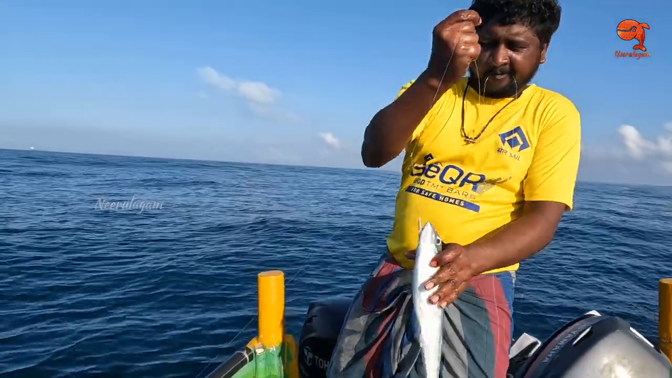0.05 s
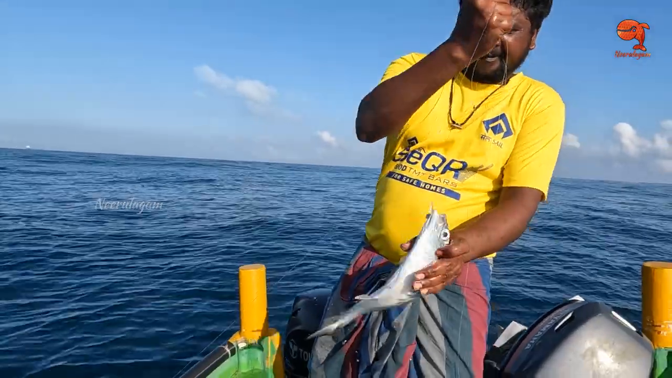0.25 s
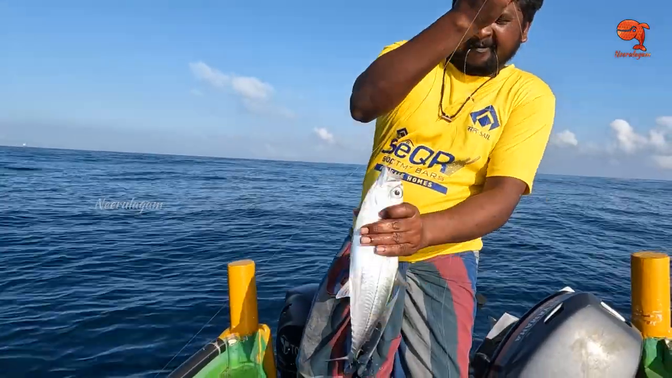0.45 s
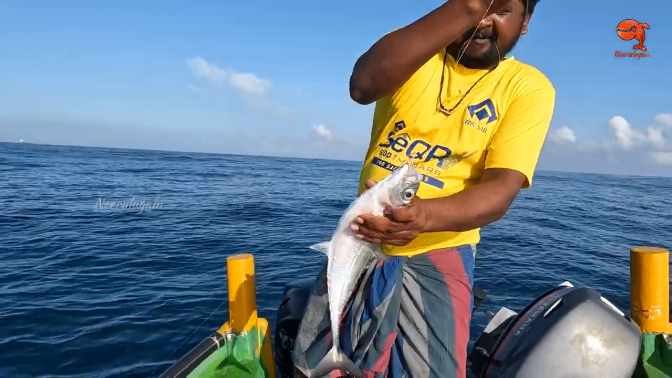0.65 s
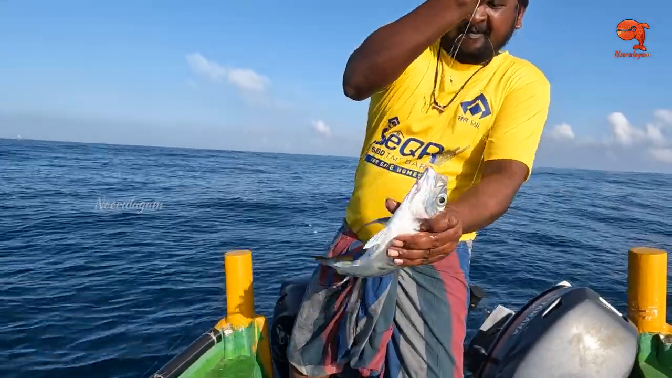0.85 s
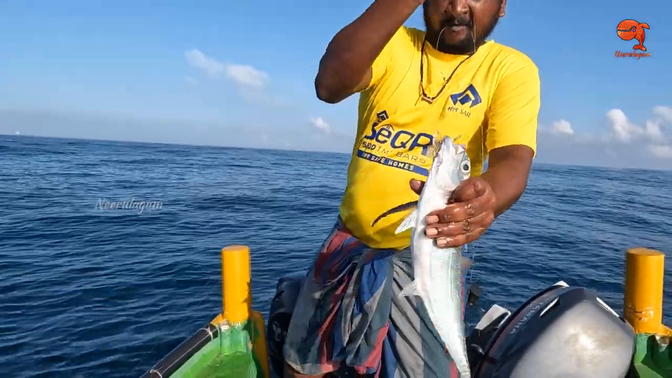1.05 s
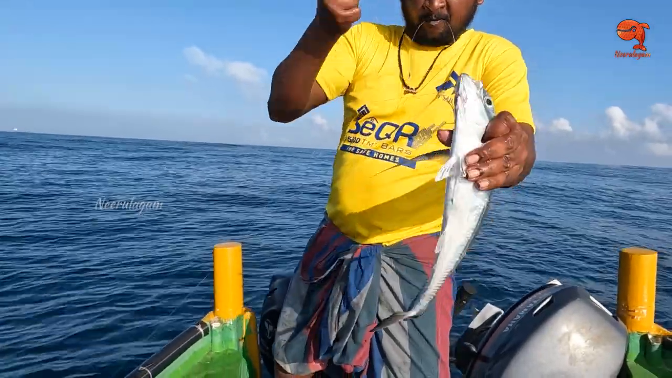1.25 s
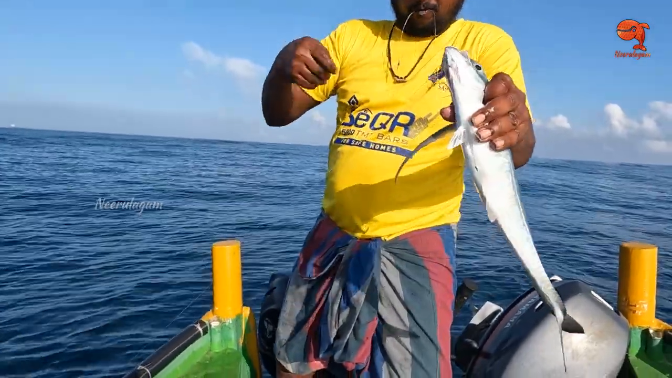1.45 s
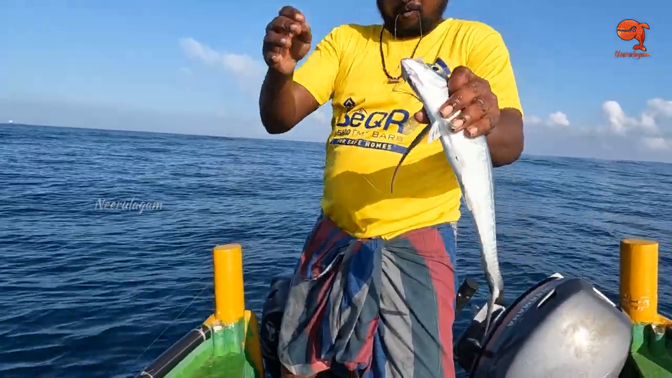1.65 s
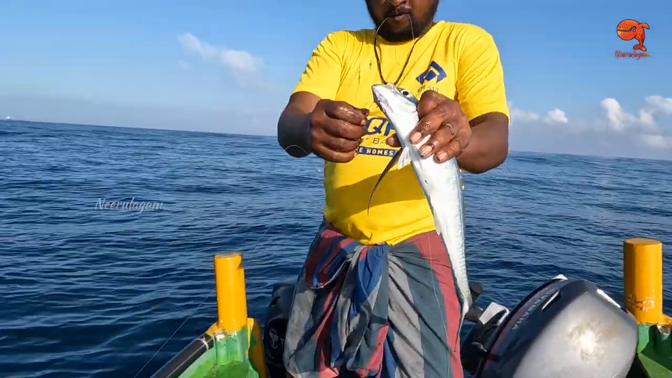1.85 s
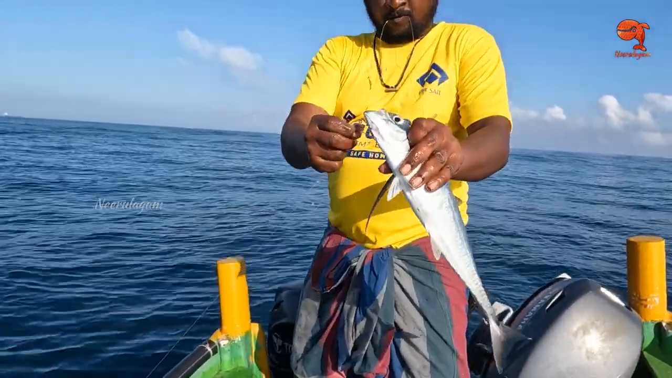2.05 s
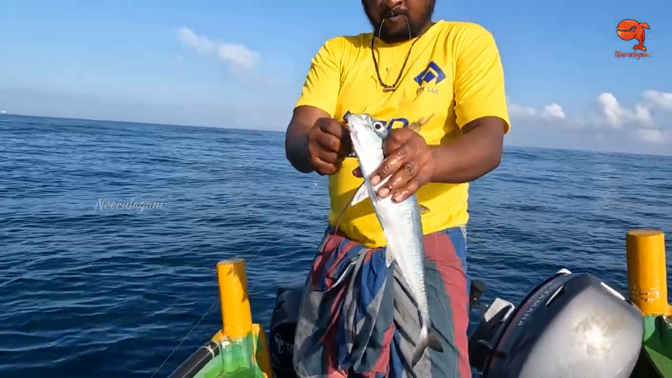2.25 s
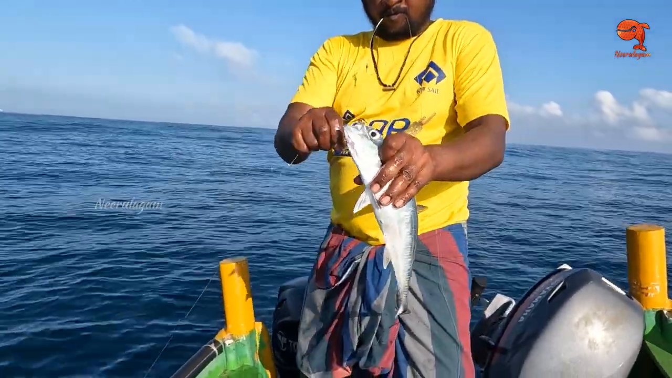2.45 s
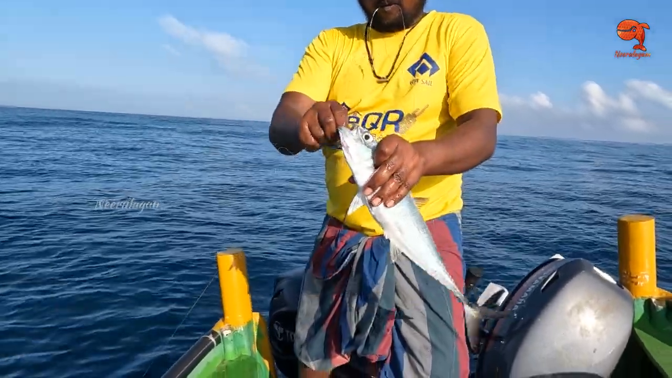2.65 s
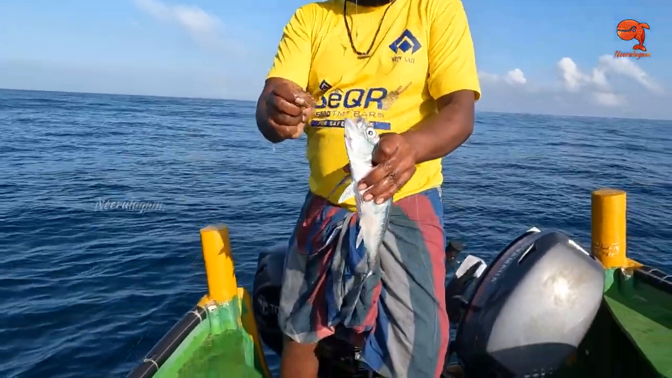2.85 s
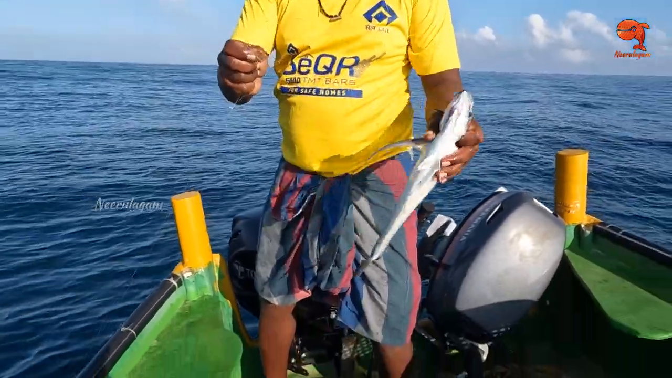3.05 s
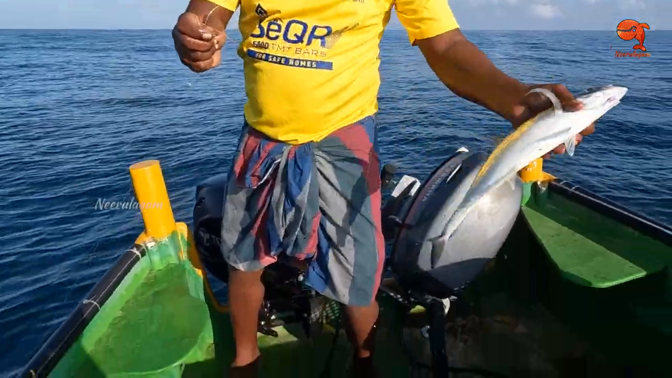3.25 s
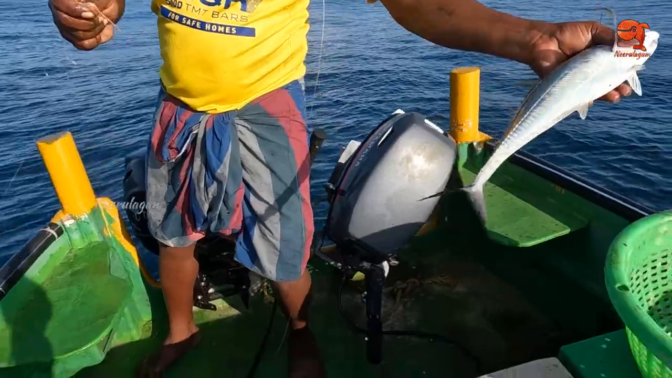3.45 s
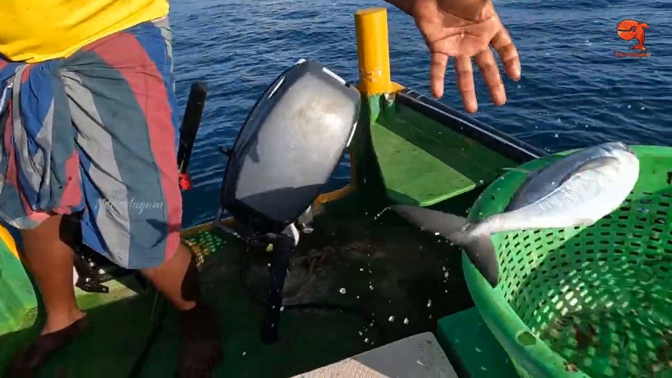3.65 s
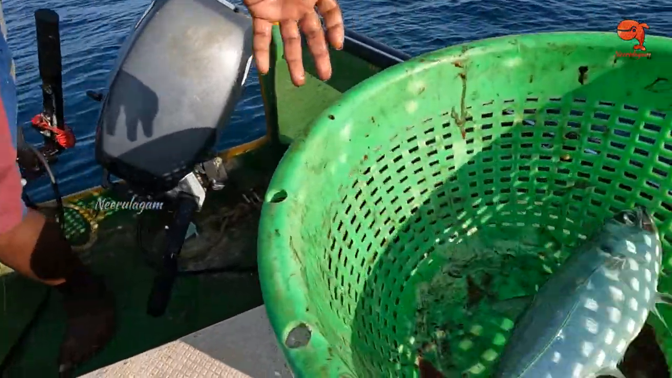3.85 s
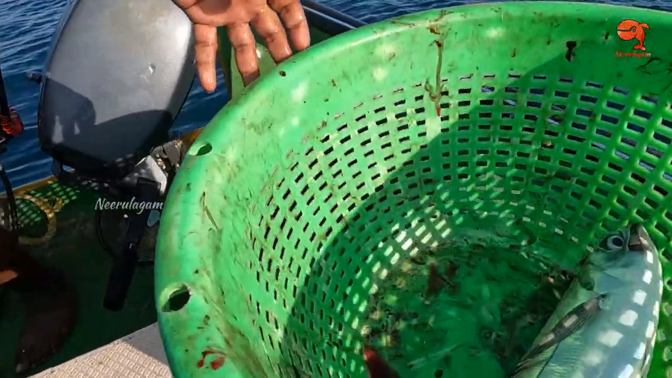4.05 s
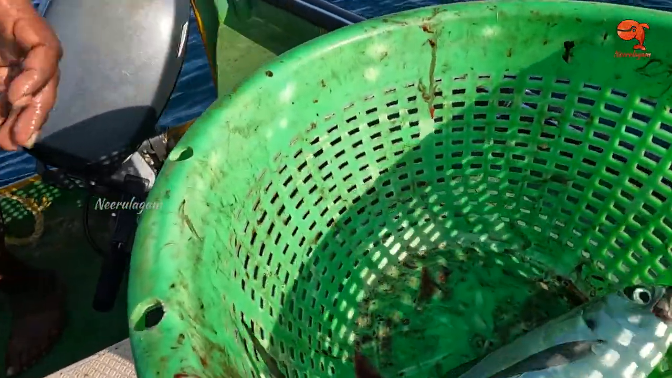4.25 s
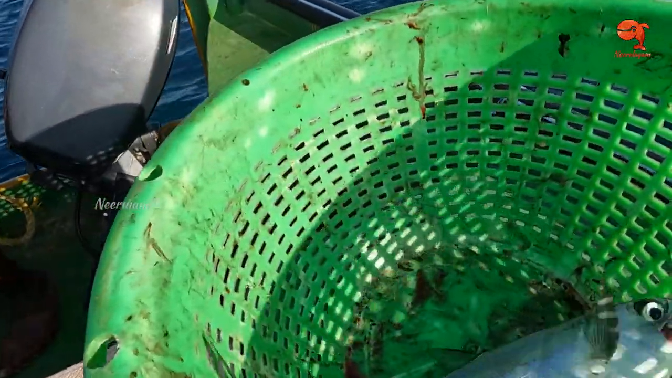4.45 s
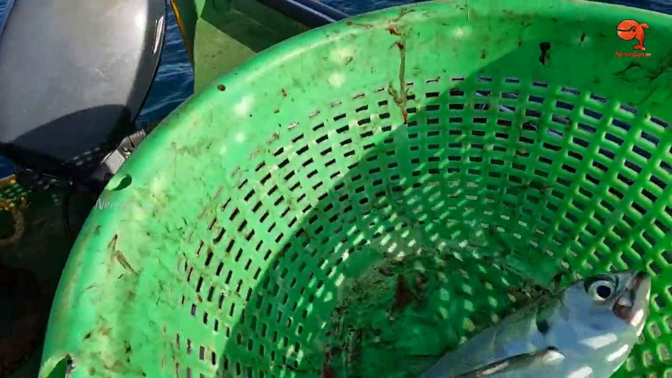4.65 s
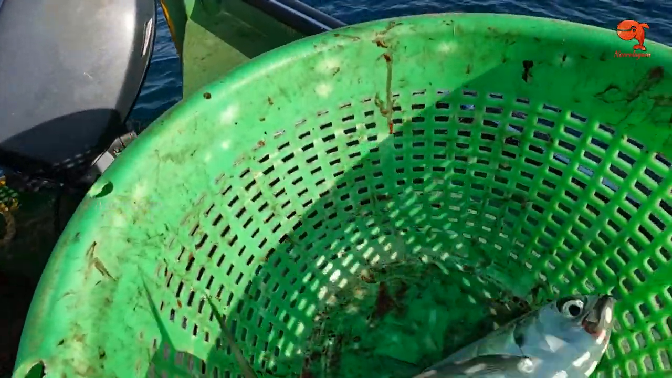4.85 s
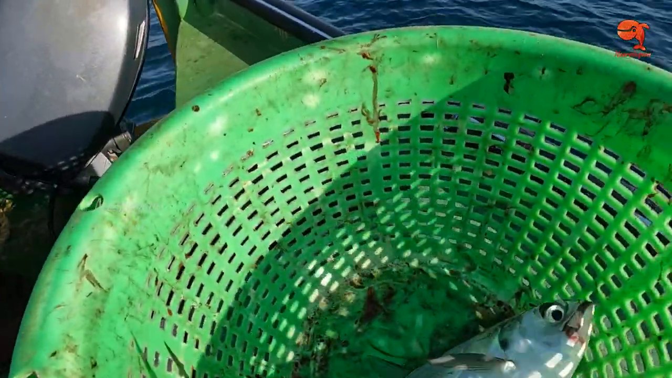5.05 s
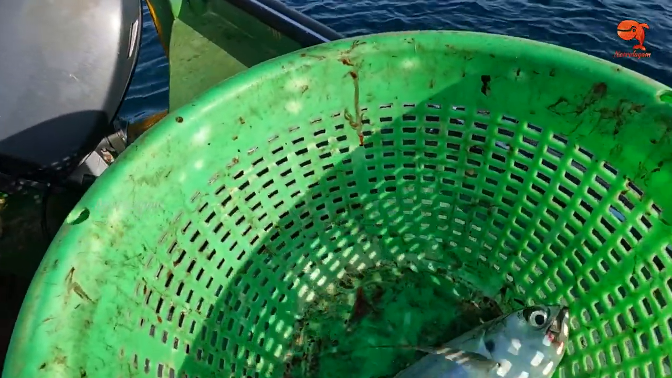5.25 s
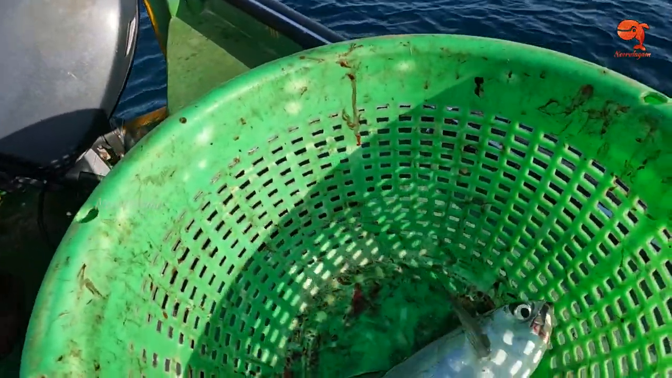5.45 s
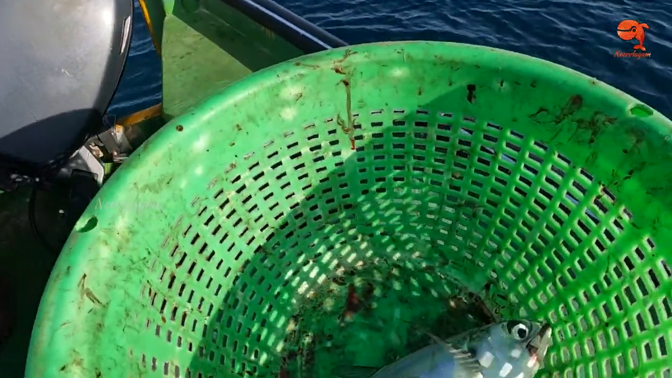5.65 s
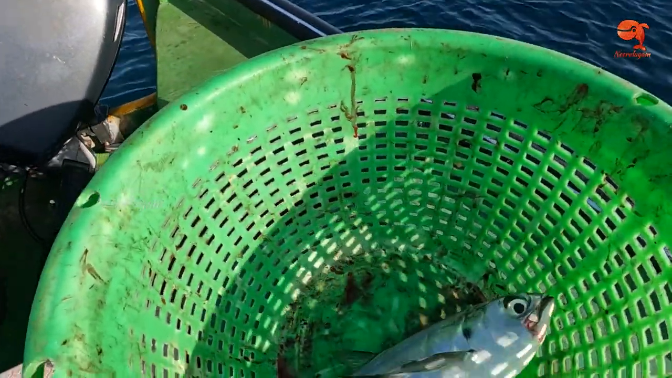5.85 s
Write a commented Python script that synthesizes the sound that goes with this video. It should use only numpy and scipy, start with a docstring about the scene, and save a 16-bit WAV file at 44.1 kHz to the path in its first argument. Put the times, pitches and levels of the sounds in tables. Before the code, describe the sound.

On a small open boat, a strong dull thud with a wet snap comes first, then faint wet ticks, skin rustles, small gurgles and soft hull knocks over a quiet sea wash. Just before four seconds a fish lands in a plastic basket and thrashes, with loud sharp slaps, dry rattles and low deck booms to the end. Close stereo microphone, outdoors, no echo.

```python
"""A fish is unhooked on a small boat at sea: wet ticks (ringing noise scratches), rustles (clumped grains),
gurgles (gliding tones) and thuds (hull modes struck by clicks).
From about 3.8 s it thrashes in a plastic basket: sharp slaps ring the wall modes, the deck drums at one low pitch.
Throughout, filtered noise makes the sea wash below and low shudders roll through the hull.
Near the end the stereo image closes to the middle."""
import sys
import numpy as np
from scipy import signal
from scipy.io import wavfile

SR = 44100
rng = np.random.default_rng(int(sys.argv[2]) if len(sys.argv) > 2 else 0)


def how_loud(loudness_db):
    """Turn decibels into a plain amplitude multiplier (0 dB gives 1, 20 dB gives 10)."""
    steps = np.asarray(loudness_db, float) / 20
    return 10 ** steps


def transcribe(signal):
    """Save signal, clipped to [-1, 1], as a 16-bit WAV file at the path in sys.argv[1]."""
    frames = np.atleast_2d(signal).T
    limited = np.clip(frames, -1, 1)
    pcm = np.round(limited * 32767).astype(np.int16)
    wavfile.write(sys.argv[1], SR, pcm)


N = 260631

# Levels are relative; pan and lean: left over right.
# Tail and body on the basket wall: start_s, level_db, struck_spot_hz, wet_crack_db
SLAPS = [(3.7915, -48, 1230, -40), (3.871, -21, 2000, -22), (3.8887, -6, 2470, -31),
         (3.8957, -13, 1600, -18), (3.92, -8, 1220, -11.5), (3.9547, -16.5, 1330, -40),
         (3.9648, -18.5, 2480, -41), (4.0007, -28, 1560, -27), (4.0256, -31, 1650, -40.5),
         (4.0372, -27.5, 1740, -55), (4.1284, -42.5, 1620, -34.5), (4.1485, -16, 1420, -22.5),
         (4.1797, -9, 1140, -24.5), (4.23, -30.5, 1440, -41), (4.3195, -25.5, 1800, -33),
         (4.3742, -28, 1560, -67), (4.4829, -28, 1560, -35), (4.5268, -16, 930, -29.5),
         (4.5737, -27, 1770, -29), (4.588, -16, 1890, -66), (4.6516, -29, 1590, -57),
         (4.782, -22.5, 1360, -56), (4.7912, -19.5, 1370, -27.5), (4.8057, -13, 1250, -19),
         (4.863, -20.5, 1840, -61), (4.8882, -26.5, 1520, -40), (4.9012, -42, 1830, -34.5),
         (4.9223, -13, 1130, -24), (5.026, -63, 1350, -39), (4.996, -53, 1200, -53),
         (5.0163, -32, 1350, -69), (5.0509, -19.5, 1580, -48), (5.0824, -34, 1270, -41),
         (5.114, -28.5, 1010, -57), (5.136, -35, 1760, -48), (5.165, -34.5, 1360, -47.5),
         (5.211, -29, 1400, -73), (5.2422, -23.5, 1250, -71), (5.2776, -15, 1900, -32.5),
         (5.2982, -28.5, 1350, -48), (5.3227, -26, 1240, -43), (5.3331, -16.5, 1320, -27.5),
         (5.3899, -26.5, 1430, -42.5), (5.464, -30, 870, -70), (5.4957, -27, 1620, -42),
         (5.5223, -13.5, 1160, -30), (5.5547, -28, 1320, -61), (5.5789, -19, 1270, -37),
         (5.5947, -23, 1140, -38.5), (5.62, -22, 990, -42), (5.6308, -15.5, 1270, -71),
         (5.6667, -34, 1670, -75), (5.694, -32, 1740, -66), (5.762, -15.5, 1150, -33.5),
         (5.7846, -30, 1740, -54), (5.795, -23, 1960, -41), (5.814, -26, 1910, -49),
         (5.8349, -28.5, 1240, -75), (5.8908, -36, 1360, -88)]
# Modes of the basket wall: mode_hz, level_db, t60_s
BASKET_MODES = [(1010, 0.5, 0.043), (1130, 3, 0.0079), (1270, 7, 0.013), (1383, -5, 0.05),
                (1620, -0.5, 0.0095), (1740, -3.5, 0.025), (1970, 9.5, 0.0031), (2770, -10, 0.016),
                (3420, 1.5, 0.0086)]
# Blows carried by the boat: start_s, knock_db, body_db
THUDS = [(0.028, -1.5, -4), (0.044, -15, -20), (0.139, -25, -23), (0.379, -29.5, -33), (0.505, -36, -22.5),
         (0.803, -57, -26), (0.923, -37, -57), (1.191, -15, -36), (1.238, -16, -53), (1.38, -25, -29),
         (1.562, -23.5, -61), (1.626, -28.5, -55), (1.843, -20.5, -24.5), (1.999, -26.5, -28),
         (2.318, -22, -52), (2.347, -14, -59), (2.358, -16, -24.5), (2.713, -25.5, -42),
         (3.088, -32.5, -41), (3.336, -18, -45), (3.361, -21.5, -28.5), (3.441, -31, -53),
         (3.548, -30, -19.5), (3.871, -28, -45), (3.896, -20, -8), (3.919, -20, -22), (4.039, -25.5, -42),
         (4.15, -22, -21), (4.18, -30, -15.5), (4.788, -8.5, -13), (4.805, -23, -1.5), (4.891, -42, -17),
         (4.912, -13.5, -15), (4.977, -21, -6), (5.045, -36, -9), (5.12, -37, -44), (5.205, -30, -37),
         (5.242, -13.5, -16.5), (5.28, -25.5, -25), (5.388, -47, -14), (5.579, -11.5, -35),
         (5.633, -38, -46), (5.818, -19, -52)]
# Modes of the hull: mode_hz, level_db, t60_s
HULL_MODES = [(146, -5.5, 0.1), (192.5, -3, 0.13), (242, -8, 0.051), (329, -16, 0.13), (409, -10, 0.085),
              (583, -8.5, 0.018), (727, -12.5, 0.033)]
# Wet skin, line and hook in the hands: start_s, level_db, pitch_hz, hiss_db
TICKS = [(0.026, -19, 2220, -13.5), (0.0373, -32.5, 1020, -43), (0.0617, -37, 840, -40),
         (0.1452, -37.5, 860, -42), (0.1628, -34, 1730, -35), (0.2188, -40.5, 890, -46),
         (0.439, -27.5, 1970, -70), (0.461, -39, 2050, -67), (0.55, -36, 1730, -41),
         (0.7126, -41.5, 1930, -38), (0.761, -47, 1410, -37), (0.8209, -29.5, 4370, -30),
         (0.8557, -39, 1700, -61), (0.895, -31.5, 1290, -64), (0.9172, -36.5, 1370, -73),
         (1.0767, -27, 3520, -55), (1.111, -39, 4300, -32.5), (1.1437, -34, 3920, -32),
         (1.155, -31.5, 3740, -45), (1.177, -28.5, 1300, -31.5), (1.1942, -24.5, 1120, -34),
         (1.203, -28, 3220, -47), (1.2333, -28, 1430, -17), (1.2534, -31.5, 4550, -14.5),
         (1.4802, -68, 4800, -32), (1.5114, -41, 1370, -33), (1.5617, -37.5, 1010, -45),
         (1.6264, -45.5, 1100, -71), (1.8456, -40, 1010, -40), (1.972, -51, 2180, -55),
         (2.061, -45, 2580, -38.5), (2.125, -45, 2870, -54), (2.184, -38.5, 2400, -49),
         (2.203, -48, 3200, -38), (2.319, -40, 1010, -61), (2.3457, -26.5, 920, -39),
         (2.3596, -30.5, 980, -51), (2.4137, -24.5, 1680, -71), (2.455, -41, 3000, -45),
         (2.495, -44.5, 2480, -64), (2.5646, -42, 1780, -39.5), (2.676, -34.5, 1630, -69),
         (2.715, -37, 3700, -42), (2.742, -44, 1400, -60), (2.813, -35, 2600, -32),
         (2.83, -32.5, 2270, -51), (2.8398, -36.5, 2180, -40), (2.869, -42, 1140, -69),
         (2.906, -35.5, 1140, -56), (3.0647, -46, 1170, -34), (3.23, -41, 1400, -50),
         (3.326, -31, 1200, -68), (3.3398, -42, 910, -45.5), (3.362, -33.5, 1220, -33.5),
         (3.4434, -40.5, 1580, -70), (3.6334, -31.5, 3200, -34.5), (3.679, -27, 1840, -28.5),
         (3.696, -45, 2160, -42)]
# Dull ticks come from the left: pitch_hz, pan_db
TICK_PAN = [(850, 26), (1100, 8.5), (1800, 7), (4000, -2)]
# Deck drumming under the basket as the body rolls: full_level_s (the rise leads up to it), level_db, hold_s
DECK_BOOMS = [(3.906, -6.5, 0.037), (4.047, -13, 0.004), (4.161, -17, 0.062), (4.328, -28, 0.0046),
              (4.44, -36, 0.075), (4.577, -23.5, 0.034), (4.656, -30.5, 0.045), (4.944, -11.5, 0.013),
              (5.11, -39, 0.0058), (5.194, -21, 0.12), (5.309, -17, 0.028), (5.466, -20, 0.043),
              (5.587, -11.5, 0.079), (5.755, -34, 0.003), (5.831, -11, 0.0037)]
# Rubbing of skin and cloth, then of the fish on the ribs: time_s, level_db, treble_over_level_db
RUSTLE_CURVE = [(0.0, -53.5, 0), (0.21, -45.5, -9), (0.39, -63, -7), (1.05, -60.5, 4), (1.55, -64.5, -1),
                (2.04, -60, -8.5), (2.3, -65, -22), (2.45, -56.5, -7), (2.62, -61.5, -24),
                (2.7, -51.5, -4.5), (2.88, -52, -29), (3.11, -61.5, -9), (3.3, -58, -20), (3.36, -52, -5.5),
                (3.52, -51.5, -6), (3.6, -57.5, -4), (3.68, -59.5, -3), (3.78, -62.5, 6), (4.03, -49, -4),
                (4.5, -52, -6), (4.86, -52, -10), (5.4, -47.5, -20), (5.56, -37.5, -11), (5.69, -64, -4),
                (5.81, -37.5, -13), (5.91, -80, -23)]
# Gurgles: start_s, level_db, start_pitch_hz, end_over_start_pitch, length_s
BUBBLES = [(0.615, -44, 1013, 1.1, 0.038), (0.81, -49, 1635, 1.04, 0.042), (0.904, -48, 1336, 1.46, 0.036),
           (1.003, -50, 1240, 1.02, 0.044), (2.014, -57, 3120, 0.67, 0.01), (2.177, -52, 1440, 0.9, 0.049),
           (2.271, -48, 1250, 0.92, 0.02), (2.827, -49, 2090, 1.1, 0.038), (2.899, -35.5, 1063, 1.1, 0.036),
           (2.993, -48, 2480, 1.03, 0.0085), (3.39, -46, 1590, 1.07, 0.022),
           (3.677, -34, 1580, 1.47, 0.011), (4.114, -40.5, 2450, 1.06, 0.022),
           (5.592, -22.5, 4630, 1.25, 0.0051)]
# Low rumble, surging from about 3.8 s as the fish thrashes: time_s, level_db
RUMBLE_CURVE = [(0.0, -28), (0.1, -32), (0.3, -34), (1.8, -39), (2.01, -34), (2.3, -37.5), (3.67, -35),
                (3.82, -32.5), (3.97, -13.5), (4.05, -34), (4.25, -22.5), (4.33, -38), (4.64, -24.5),
                (4.74, -33), (4.86, -19.5), (5.17, -17.5), (5.35, -26), (5.56, -22), (5.91, -25)]
# Low shudders of the hull: full_level_s (the rise leads up to it), level_db, hold_s,
# lean_db (the rumble takes half of it, the shudders one and a half times)
SHUDDERS = [(0.0, -27, 0.0046, 1.5), (0.18, -31, 0.006, 2.5), (0.933, -30.5, 0.005, 1.5),
            (1.234, -31.5, 0.005, 2.5), (1.97, -41, 0.0043, 3.5), (2.356, -40, 0.09, 2),
            (3.706, -48, 0.0055, -1.5), (3.966, -29, 0.013, -1), (4.244, -49, 0.005, -5),
            (4.834, -31.5, 0.13, -16.5), (4.979, -31.5, 0.067, -20.5), (5.15, -22, 0.19, -11.5),
            (5.675, -29, 0.0039, -2.2)]
# Spectrum of the background wash, with the microphone's steep step above 760 Hz:
# frequency_hz, density_db (per Hz)
WASH_SPECTRUM = [(250, -14), (400, -1.5), (760, -8), (950, -82), (1500, -10), (2600, -29), (6800, -27),
                 (8500, -39), (15000, -37)]
# Left-right likeness of the wash: frequency_hz, likeness (0..1)
WASH_LIKENESS = [(60, 0.96), (180, 0.29), (550, 0.83), (1650, 0.28), (4970, 0.52), (15000, 0.26)]
# Stereo image closing near the end: time_s, side_db
WIDTH_CURVE = [(0.0, -1.5), (5.35, -3), (5.5, -9.5), (5.8, -16), (5.84, -33), (5.91, -40)]


def slaps(spot_width_ln_hz=0.48, uneven_db=5.5, roll_s=0.00591, touch_count=3):
    """Flesh lands in a few touches that favour wall modes near the struck spot; wet cracks and skitter surround them."""
    s, level_db, spot_hz, crack_db, pan_db = contacts()
    chance = rng.standard_normal((len(s), touch_count, len(BASKET_MODES)))
    # the first touch is on time
    delay_s = rng.random((len(s), touch_count)) * roll_s * np.arange(touch_count) / touch_count
    out = puff(train(s, how_loud(crack_db), pan_db), 0.024, 3530, 6630, alike=0.6, rise_s=0.0015)
    out += puff(train(s, how_loud(crack_db - 0.5), pan_db + 4.5), 0.013, 4600, 10100, alike=0.61, rise_s=0.0012)
    out += puff(train(s, how_loud(level_db - 7.0), pan_db), 0.04, 960, 2120)   # loose rattle of the ribs
    out += band(train(s, how_loud(crack_db - 9.5), pan_db + 15.0), 1400, 12500)   # the skin snaps free
    # scales skitter over the ribs before and after
    skitter = skitter_round(s, level_db - 28.5)
    out += band(skitter_round(s, crack_db, before_s=0.0055, after_s=0.025), 2800, 6300)
    for k, (mode_hz, mode_db, t60_s) in enumerate(BASKET_MODES):
        near_db = np.maximum(-8.0 * (np.log(mode_hz / spot_hz) / spot_width_ln_hz) ** 2, -18.0)
        touches = 0
        for j in range(touch_count):
            gain = how_loud(level_db + mode_db + near_db - 9.5 + uneven_db * chance[:, j, k])
            sign = np.sign(chance[:, j, k - 1])
            touches = touches + train(s + delay_s[:, j], gain * sign, pan_db + chance[:, j, k - 2])
        scatter = skitter * how_loud(mode_db) * rng.standard_normal(N)
        out += ring(touches + scatter, mode_hz, t60_s)
    # the open mesh radiates no bass
    return signal.sosfilt(signal.butter(3, 800.0, "high", fs=SR, output="sos"), out)


def contacts():
    """Each slap rebounds once, weaker on the whole, on another spot and the opposite side."""
    basket_pan_db, pan_spread_db = -1, 11.5   # a little to the right
    rebound_s, rebound_db, rebound_spread_db = (0.007, 0.031), -20.5, 7.0
    s, level_db, spot_hz, crack_db = np.transpose(SLAPS)
    wait, size, spot, side = rng.random((len(s), 4)).T * 2 - 1
    change_db = rebound_db + rebound_spread_db * size
    later_s = s + np.interp(wait, [-1, 1], rebound_s)
    pan_db = basket_pan_db + pan_spread_db * side
    first = [s, level_db, spot_hz, crack_db, pan_db]
    rebound = [later_s, level_db + change_db, spot_hz * 2 ** (spot / 2), crack_db + change_db, -pan_db]
    return np.hstack([first, rebound])


def thuds(soft_hz=795.0, pan_spread_db=2.0):
    """Soft blows ring the hull: the two lowest modes as body, the others as knock."""
    s, knock_db, body_db = np.transpose(THUDS)
    chance = rng.standard_normal((len(s), len(HULL_MODES), 2))
    # fleshy scuffle
    out = puff(train(s, how_loud(knock_db - 6.5), 3.6), 0.062, 290, 705, alike=0.77, rise_s=0.0076)
    for k, (mode_hz, mode_db, t60_s) in enumerate(HULL_MODES):
        blow_db = body_db if k < 2 else knock_db
        strength = how_loud(blow_db + mode_db + 3.03 * chance[:, k, 0]) * (-1) ** k
        out = out + ring(train(s, strength, pan_spread_db * chance[:, k, 1]), mode_hz, t60_s)
    # fins flapping
    flutter = band(skitter_round(s, knock_db + 3.0, per_s=600.0, after_s=0.02), 550, 1360)
    soft = signal.sosfilt(signal.butter(2, soft_hz, fs=SR, output="sos"), out)
    return soft + flutter * how_loud([[2.5], [-2.5]])


def ticks(sharpness=3.0, scratch_t60_s=0.02):
    """A short noise scratch rings one broad resonance, with hiss and crackle round it."""
    s, level_db, pitch_hz, hiss_db = np.transpose(TICKS)
    pan_db = at_hz(TICK_PAN, pitch_hz)
    out = puff(train(s, how_loud(hiss_db), pan_db), 0.008, 2800, 6950, alike=0.65, rise_s=0.0044)
    out += band(train(s + 0.0039, how_loud(hiss_db - 4.0), pan_db + 7.0), 3600, 13500)   # the snap
    out += band(skitter_round(s, level_db + 6.0, per_s=1300.0, before_s=0.001, after_s=0.014), 840, 3500)
    t = np.arange(SR // 20) / SR
    scratch = rng.standard_normal((len(s), len(t))) * how_loud(-60 * t / scratch_t60_s)
    scratch[:, 0] = 1.83   # the first grip lets go at once
    for start_s, db, hz, side_db, noise in zip(s, level_db, pitch_hz, pan_db, scratch):
        rung = band(noise, hz * (1 - 0.5 / sharpness), hz * (1 + 0.5 / sharpness))
        i = int(start_s * SR)
        out[:, i:i + len(t)] += how_loud([[db + side_db / 2], [db - side_db / 2]]) * rung / np.abs(rung).max()
    return out


def boom(deck_hz=99.0, waver=0.045):
    """The deck drums at one low pitch that wavers slightly at random."""
    rise_db_per_s, fall_db_per_s = 750.0, 531
    level_db = swells(*np.transpose(DECK_BOOMS), rise_db_per_s, fall_db_per_s).max(axis=0)
    phase = np.cumsum(2 * np.pi * deck_hz * (1 + waver * drift(4.63)) / SR)
    judder = how_loud(-13.5) * rms_one(band(pair(0.98), 105, 346))   # boards shaking along
    return how_loud(level_db) * (np.sin(phase) + judder)


def rustle(typical_per_s=400.0, grain_db=4.0, t60_cycles=13.0, pitch_count=12):
    """Small grains ring a few cycles; each pitch has its own clumps, so patches come and go."""
    level_db, treble_db = in_time(RUSTLE_CURVE)
    sizes = how_loud(grain_db * np.minimum(rng.exponential(1, N), 4)) * pair(0.29)
    together = drift(25.0)
    groups = [0, 0]   # lower and upper half of the pitches
    for k, hz in enumerate(np.geomspace(950, 7500, pitch_count)):
        clumping = how_loud(5.0 * together + 5.5 * drift(12.0))
        born = rng.random(N) < typical_per_s * clumping / SR
        groups[2 * k // pitch_count] += ring(born * sizes, hz, t60_cycles / hz) / np.sqrt(hz)
    return how_loud(level_db) * rms_one(groups[0]) + how_loud(level_db + treble_db) * rms_one(groups[1])


def bubbles():
    """Air pockets in water and wet flesh: soft, slightly rough tones that glide."""
    out = np.zeros(N)
    for start_s, db, hz, glide, length_s in BUBBLES:
        t = np.arange(int(length_s * SR)) / SR
        phase = 2 * np.pi * hz * (t + (glide - 1) * t * t / (2 * length_s))
        i = int(start_s * SR)
        out[i:i + len(t)] += how_loud(db) * np.sin(np.pi * np.sqrt(t / length_s)) * np.sin(phase)
    return out * how_loud(3.5 * drift(120.0))


def shudders(lumpy_db=4.0):
    """Low noise rolls through the hull as the fish's weight shifts; it is lumpy and leans to one side."""
    rise_db_per_s, fall_db_per_s, floor_db = 214, 167, -47
    rumble_db, = in_time(RUMBLE_CURVE)
    s, level_db, hold_s, lean_db = np.transpose(SHUDDERS)
    rolls = how_loud(swells(s, level_db, hold_s, rise_db_per_s, fall_db_per_s))
    strength = rolls.sum(axis=0) + how_loud(floor_db)
    lean = how_loud(np.multiply.outer([0.5, -0.5], lean_db @ rolls / strength))
    rumble = rms_one(band(band(pair(0.97), 20.0, 113.4), 20.0, 420.0)) * how_loud(rumble_db)
    shudder = rms_one(band(band(pair(1.0), 79.4, 299), 102, 520))
    shudder = shudder * strength * how_loud(lumpy_db * (drift(19.7) - 1.5))
    rough_edge = rms_one(band(pair(0.8), 256, 730))
    shudder += rough_edge * strength * how_loud(-21.5 + lumpy_db * drift(40.0))
    return (rumble + shudder * lean) * np.sqrt(lean)


def sea(level_db=-51, patchy_db=1.5, lapping_db=6.5):
    """Water round the hull: third-octave noise bands flicker on their own; the low ones lap in step."""
    out = 0
    edges_hz = 250 * 2 ** (np.arange(18) / 3)
    lapping = drift(40.0)
    for low_hz, high_hz in zip(edges_hz, edges_hz[1:]):
        hz = np.sqrt(low_hz * high_hz)
        flicker_db = patchy_db * drift(27.0) + lapping_db * lapping * (hz < 900)
        noise = band(pair(at_hz(WASH_LIKENESS, hz)), low_hz, high_hz)
        steep = band(noise, low_hz * 0.9, high_hz * 1.1)
        out = out + how_loud(at_hz(WASH_SPECTRUM, hz) + flicker_db) * steep
    return how_loud(level_db) * rms_one(out)


def rms_one(x):
    """Scale to rms 1."""
    return x / np.sqrt(np.mean(x ** 2) + 1e-20)


def in_time(rows):
    """Curve columns at every sample."""
    s, *columns = np.transpose(rows)
    return [np.interp(np.arange(N) / SR, s, c) for c in columns]


def at_hz(points, hz):
    """Read a table on a log-frequency axis."""
    table_hz, values = np.transpose(points)
    return np.interp(np.log(hz), np.log(table_hz), values)


def band(x, low_hz, high_hz):
    """Band-pass."""
    return signal.sosfilt(signal.butter(2, [low_hz, high_hz], "band", fs=SR, output="sos"), x + 1e-18)


def drift(rate_hz):
    """Slow chance of spread 1: two-pole smoothed noise, computed every 40 samples."""
    r = np.exp(-80 * np.pi * rate_hz / SR)
    slow = signal.lfilter([1], [1, -2 * r, r * r], rng.standard_normal(N // 40 + 2002))[2000:]
    return np.interp(np.arange(N) / 40, np.arange(len(slow)), rms_one(slow))


def ring(clicks, hz, t60_s):
    """Two-pole resonator: a unit click starts a decaying sine of height 1."""
    r, w = how_loud(-60 / (t60_s * SR)), 2 * np.pi * hz / SR
    return signal.lfilter([0, np.sin(w)], [1, -2 * r * np.cos(w), r * r], clicks + 1e-18)


def train(times_s, gains, pan_db=0):
    """Stereo clicks at the given moments."""
    out = np.zeros((2, N))
    at = np.minimum((np.asarray(times_s) * SR).astype(int), N - 1)
    out[:, at] = gains * how_loud(np.multiply.outer([0.5, -0.5], pan_db + np.zeros(len(at))))
    return out


def puff(clicks, t60_s, low_hz, high_hz, alike=1.0, rise_s=0.00067):
    """Each click opens a ragged noise burst that swells briefly and dies away."""
    ragged = how_loud(4.6 * drift(99.0))
    noise = rms_one(band(pair(alike), low_hz, high_hz) * ragged)
    swell = np.exp(-1 / (rise_s * SR))
    fade = how_loud(-60 / (t60_s * SR))
    return noise * signal.lfilter([1 - swell], np.poly([swell, fade]), clicks + 1e-18)


def pair(alike):
    """Two white noises that share a part."""
    mid, side = rng.standard_normal((2, N))
    alike = np.clip(alike, 0, 1)
    return np.sqrt(1 + alike) * mid + np.sqrt(1 - alike) * side * [[1], [-1]]


def skitter_round(times_s, level_db, per_s=380.0, before_s=0.012, after_s=0.017):
    """Sparse stereo clicks that strengthen towards each moment and weaken after it."""
    blows = train(times_s, how_loud(level_db))
    lead, trail = np.exp(-1 / (before_s * SR)), np.exp(-1 / (after_s * SR))
    after = signal.lfilter([1], [1, -trail], blows)
    before = signal.lfilter([0, 1], [1, -lead], blows[:, ::-1])[:, ::-1]
    return (after + before) * (rng.random(N) < per_s / SR) * pair(0.94)


def swells(full_level_s, level_db, hold_s, rise_db_per_s, fall_db_per_s):
    """One dB envelope a row: rise up to full_level_s, hold, fall."""
    t = np.arange(N) / SR - full_level_s[:, None]
    fall_db = np.minimum(fall_db_per_s * (hold_s[:, None] - t), 0)
    return level_db[:, None] + np.minimum(rise_db_per_s * t, fall_db)


def scene():
    """All sources on the boat, in the open air."""
    return slaps() + thuds() + ticks() + boom() + rustle() + bubbles() + shudders() + sea()


def top_cut(x):
    """Nothing passes above the cut-off."""
    return signal.sosfilt(signal.butter(12, 15710, fs=SR, output="sos"), x)


def record(dry):
    """The right channel is slightly hotter, the image narrows, the extreme top is dull, peaks are rounded."""
    left, right = dry * how_loud([[-0.4], [0.4]])
    mid, side = (left + right) / 2, (left - right) / 2
    stereo = mid + side * how_loud(in_time(WIDTH_CURVE)[0]) * [[1], [-1]]
    dull = signal.sosfilt(signal.butter(4, 14000.0, fs=SR, output="sos"), stereo)
    mix = 1.026 * np.tanh(dull / 1.45)
    return top_cut(mix)


dry = scene()
out = record(dry)
transcribe(out)
```